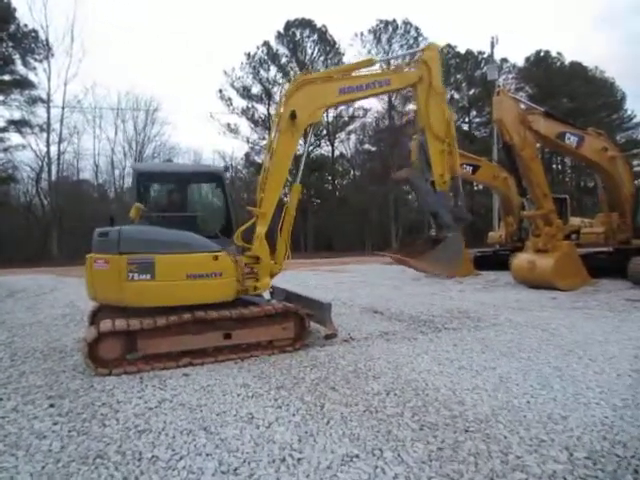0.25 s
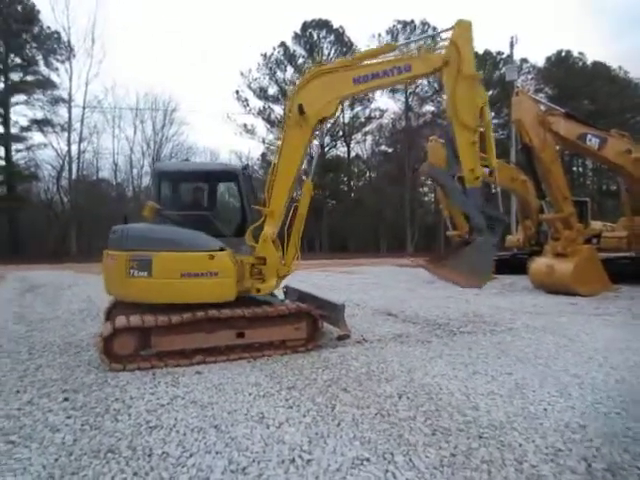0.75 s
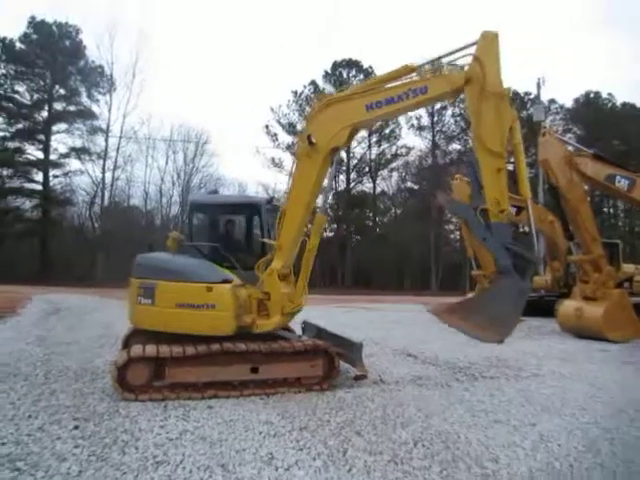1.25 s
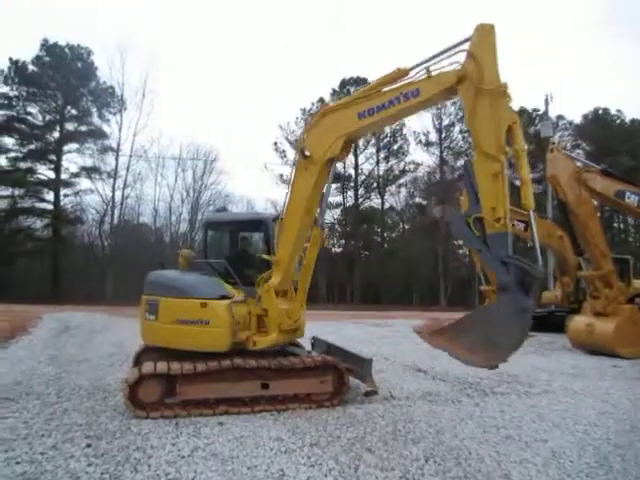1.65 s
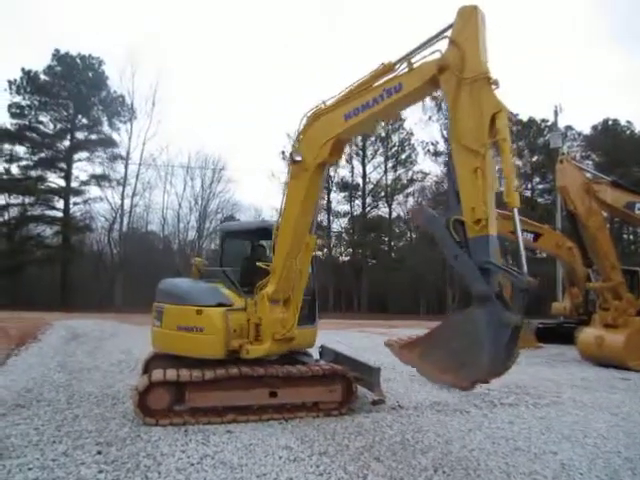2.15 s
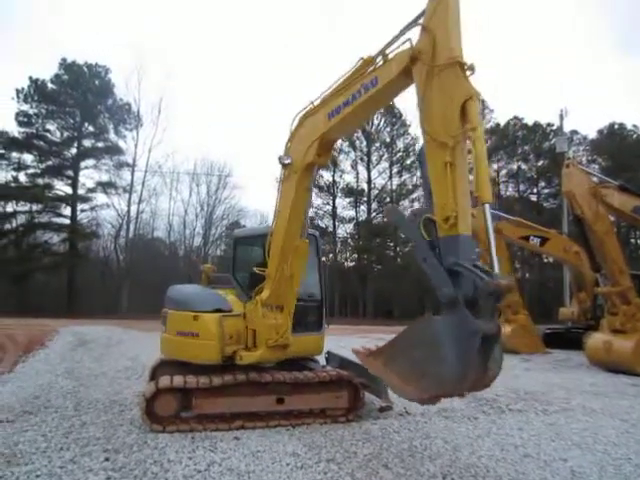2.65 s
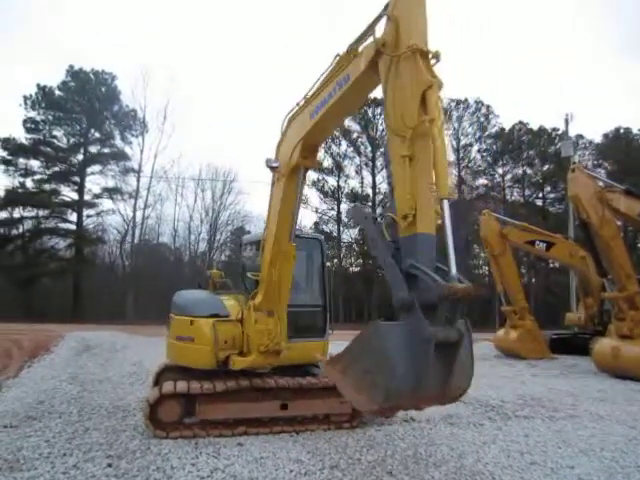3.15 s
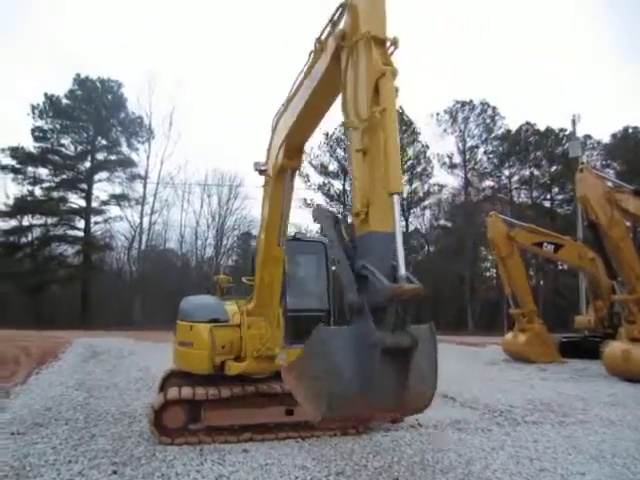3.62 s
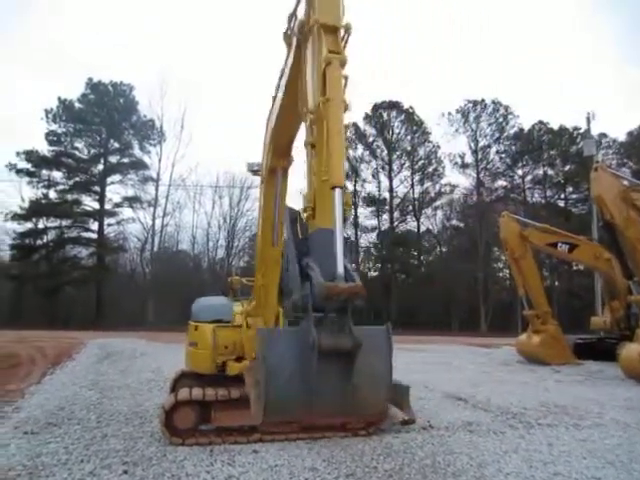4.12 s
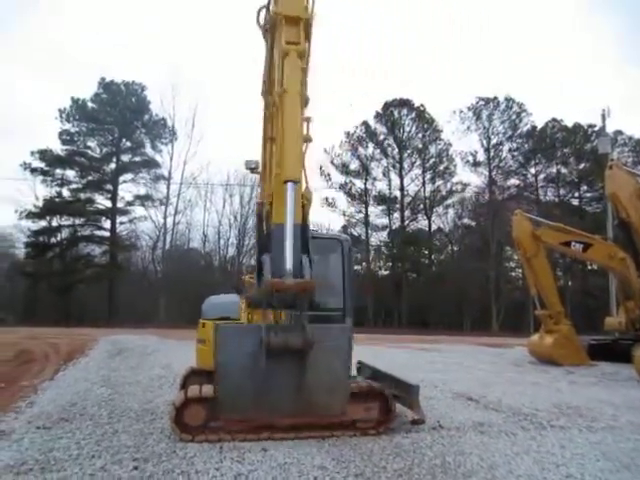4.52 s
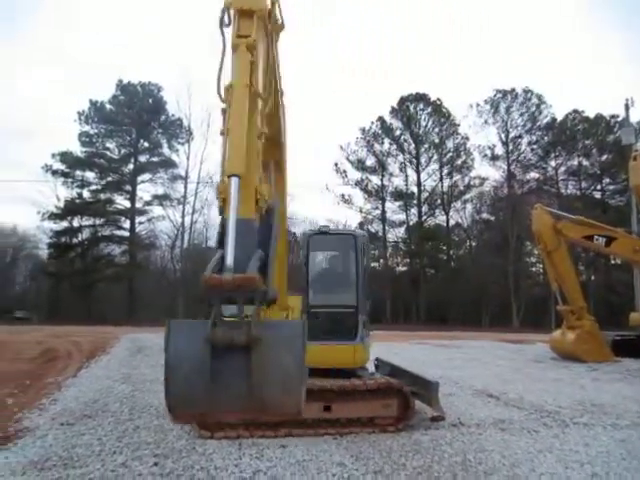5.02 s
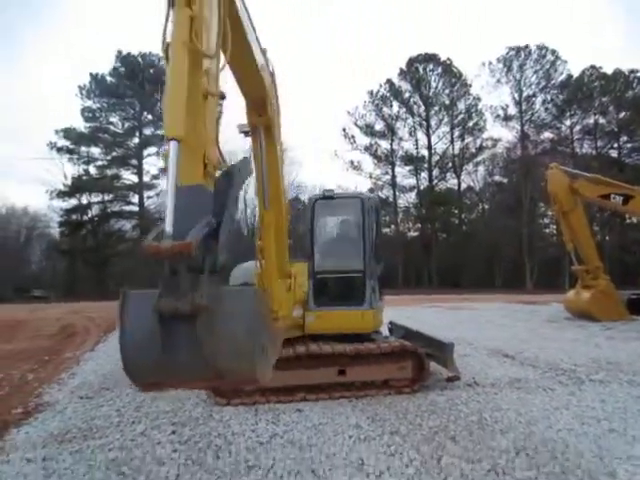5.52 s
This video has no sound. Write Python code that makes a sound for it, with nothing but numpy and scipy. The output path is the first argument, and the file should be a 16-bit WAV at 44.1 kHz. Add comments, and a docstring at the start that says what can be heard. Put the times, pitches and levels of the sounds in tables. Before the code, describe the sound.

A compact excavator's diesel engine is running outdoors from the start, at a steady working speed: a low exhaust drone with knocking, clatter and fan hiss, over a faint rumble of breeze. During the first two seconds a motor whine climbs in pitch as the machine swings, then fades by about 3 seconds. Higher hydraulic and gear tones and ringing from the metal covers swell and fade in turn. From about 3 seconds, gusts buffet the microphone, mostly on the left, with low thumps, pops and a few dry ticks. The hardest hit, near 3.4 seconds, briefly ducks the whole sound. Buffeting continues until about 5 seconds, then thins out. Meanwhile the engine grows quieter and duller as it turns away, is most muffled near 5 seconds, and recovers slightly before the end at almost 6 seconds.

```python
"""A compact excavator swings its boom on a gravel yard, its four-cylinder diesel held at working speed.
From the start: combustion knock, fan hiss, exhaust drone and pump whine over a low breeze.
Panel rings and gear tones beam past as the house turns; the swing motor climbs in pitch.
From about 3 s, gusts buffet the two microphone ports and the hardest peaks duck the gain.
The machine fades as the engine bay turns away, deepest behind the boom near 5 s."""
import sys
import numpy as np
from scipy import signal
from scipy.fft import rfft, irfft, next_fast_len
from scipy.io import wavfile

SR = 44100
rng = np.random.default_rng(int(sys.argv[2]) if len(sys.argv) > 2 else 0)


def transcribe(u):
    """Save the signal u as a 16-bit wav file named by the first command-line argument.

    u: samples, shape (n,) or (channels, n), limited to [-1, 1]; the rate is SR.
    q: integer samples, one column per channel.
    """
    v = np.clip(np.atleast_2d(u).T, -1, 1)
    q = np.round(v * 32767).astype(np.int16)
    wavfile.write(sys.argv[1], SR, q)


N = 254456
TIME_S = np.arange(N) / SR
FFT_SIZE = next_fast_len(N, True)
BIN_HZ = np.maximum(np.arange(FFT_SIZE // 2 + 1) * SR / FFT_SIZE, 1)

# Crankshaft speed. Each row: time in seconds, revolutions per second.
CRANK_SPEED = [(0.0, 33.6), (0.8, 34.07), (1.2, 34.12), (2.0, 34.27), (3.0, 34.2), (4.9, 34.21),
               (5.77, 34.3)]
# Edges in Hz of the five engine bands: rumble, panel, knock, clatter, hiss.
BAND_EDGES_HZ = [85, 380, 600, 1150, 1900, 15800]
# Lower four bands, before trim. Each row: start level in dB, slope in dB/s, loss behind the boom in dB.
BAND_LEVELS = [(-18.5, 1.03, 11), (-27.5, -0.69, 8.5), (-25, 0, 10), (-33, -0.5, 12.5)]
# Hiss band, before trim; the boom shadows it most. Each row: time in seconds, level in dB.
HISS_LEVEL = [(0, -49), (1.4, -49), (3.2, -51), (3.9, -54), (4.3, -59.5), (4.6, -63), (4.88, -67),
              (5.25, -62.5), (5.77, -59)]
# Engine noise shape within the bands. Each row: frequency in Hz, relative density in dB.
ENGINE_SPECTRUM = [(85, 2), (200, 3.5), (300, 1.5), (400, -8), (520, -8), (730, -10), (900, -17.5),
                   (1150, -24.5), (1420, -18), (2000, -33.5), (2400, -32.5), (3400, -41.5), (5000, -44),
                   (14000, -48.5)]
# Stereo balance of the machine. Each row: frequency in Hz, left minus right in dB.
BALANCE = [(100, -1), (400, -1), (750, -2.5), (1100, -3.5), (1450, -8.5), (1750, -9), (2050, 11),
           (2700, -3.5), (5000, 3.5), (12000, 4.5)]
# Stereo likeness of the engine noise. Each row: frequency in Hz, left-right coherence from 0 to 1.
COHERENCE = [(100, 1), (280, 0.97), (600, 1), (1400, 0.8), (2500, 0.4), (6000, 0.67), (14000, 0.72)]
# Cover panel resonances, with two low rows for the growl of the swing under load. Each row: centre in Hz, width
# in Hz, level over its band in dB before trim, # time facing us in seconds, beam sigma in seconds.
PANEL_MODES = [ (670, 43, -5, 0.16, 0.26), (752, 60, -10, 0.21, 1.9), (1046, 91, -9, 0.2, 0.42),
               (1216, 130, -4, 0.15, 0.85), (1019, 77, -9.5, 1.83, 0.25), (1367, 120, -6.5, 1.8, .8),
               (677, 210, -1.5, 1.53, 0.3), (774, 62, -5.5, 3.2, 0.15), (885, 59, -5.5, 3.05, 0.27),
               (1006, 87, -6.5, 3.3, 0.8), (233.5, 140, -6, 2.27, 0.75), (153, 60, -3, 1.53, 0.27),
               (1696, 47, -15, 5, 1.3), (794, 130, -8, 4.4, 0.77), (1029, 82, -11, 5.4, 0.91),
               (2227, 65, -4, 0.9, 0.87), (2230, 64, -12.5, 2.7, .6), (4840, 100, -17, 2.6, 1.9)]
# Steady engine tones: block, fan, pump stroke and a thin whistle. Each row: multiple of the four-stroke cycle
# rate, level over its band in dB.
STEADY_TONES = [(6, -21.5), (8, -15.5), (10, -23), (12, -12.5), (14, -19.5), (20, -20), (45, -12),
                (48, -19), (72, -21), (131, -16.5), (139, -19), (280, -28)]
# Pump and gear tones. Each row: multiple of the cycle rate (rounded in use), level in dB,
# time facing us in seconds, beam sigma in seconds.
PUMP_GEAR_TONES = [ (9, -28.5, 1.85, .3), (38, -33, 0.26, 0.52), (40, -28.5, 0.17, 0.39),
                   (40, -36, 1.95, 0.33), (44, -32.5, 1.3, 0.21), (45, -34, 0.17, 0.46),
                   (45, -35, 3.15, 0.38), (46, -33.5, 2.34, 0.57), (51, -34.5, 3.0, 0.57),
                   (57, -35.5, 1.5, 0.14), (57, -42, 2.9, 0.27), (60, -44, 2.95, .35),
                   (63.4, -41, .25, 0.51), (68, -48.5, 2.9, 0.29), (70.7, -45.5, 0.63, 0.15),
                   (79, -48, 1.3, 0.32), (82.3, -50, 2.6, .35), (83.2, -48, 2.2, 0.24),
                   (84, -48.5, 1.73, .17), (84, -49, 1.5, .2), (86, -52.5, 2.65, .2),
                   (89, -55.5, 2.75, 0.25), (95.3, -58, 3.0, .35), (97.7, -61, 1.6, 0.11)]
# Thin whistle that stands out as the hiss fades. One row, columns as above.
WHISTLE_TONE = (131, -65, 3.85, .45)
# Exhaust note. One row: start level in dB, slope in dB/s, loss behind the boom in dB.
EXHAUST_LEVEL = (-20.5, -1.4, 2.9)
# Hydraulic pump: piston tone, then its near octave. Columns as for the exhaust.
PUMP_LEVELS = [(-31, -2.5, -2.5), (-30, -3.5, -2.5)]
# Swing drive. Each row: time in seconds, motor pitch in Hz, motor level in dB, gear level in dB.
SWING_DRIVE = [(0, 469, -25, -26), (0.45, 496.5, -28, -55), (0.8, 522.6, -26, -53), (1.1, 549.5, -28, -51),
               (1.35, 590, -29, -29), (1.55, 620, -28.5, -46), (1.8, 679, -28.5, -54),
               (2.15, 701.4, -33.5, -52), (3.3, 718, -43, -60)]
# Breeze on the ports. Each row: time in seconds, level in dB.
BREEZE_LEVEL = [(0, -30), (1.7, -30.5), (2.7, -33.5), (3.1, -20.5), (3.35, -21), (3.55, -16.5), (3.85, -21),
                (3.99, -18.5), (4.12, -20.5), (4.8, -30.5), (5.77, -24)]
# Main wind buffets. Each row: centre in seconds, length in seconds, level in dB,
# port (0 left, 1 right), upper edge in Hz.
MAIN_BUFFETS = [ (3.278, 0.034, -10.5, 0, 282), (3.366, 0.037, -8.5, 0, 175), (3.396, 0.018, -10, 0, 335),
                (3.841, 0.083, -11.5, 0, 138), (3.951, 0.093, -9.5, 1, 99.5), (4.026, 0.015, -24, 0, 380),
                (4.057, 0.0059, -11.5, 0, 1090), (4.072, 0.02, -13.5, 0, 927), (4.145, 0.038, -16, 0, 695),
                (4.2, 0.015, -18, 0, 520), (4.234, 0.028, -17.5, 0, 406), (4.252, 0.042, -22.5, 0, 770),
                (4.271, .02, -15.5, 0, 464), (4.368, 0.02, -16.5, 0, 403.2), (4.386, 0.0097, -12.5, 0, 900),
                (4.393, 0.024, -13.5, 1, 414), (4.399, 0.0096, -15, 0, 1000), (4.425, 0.021, -19, 0, 382),
                (4.456, 0.017, -20, 0, 697), (4.485, 0.021, -20.5, 0, 700), (4.508, 0.016, -13, 0, 500),
                (4.54, 0.018, -29, 0, 380), (4.612, 0.016, -23.5, 0, 480), (4.652, 0.025, -19, 0, 550),
                (4.675, .018, -21, 0, 426), (4.775, 0.022, -15, 0, 556), (4.827, 0.025, -17, 0, 787),
                (4.882, 0.02, -21.5, 0, 476), (5.082, 0.028, -19.5, 0, 476), (5.588, 0.04, -13.5, 0, 99)]
# Hard eddies on the left port. Each row: time in seconds, push in dB, half-width in seconds.
HARD_EDDIES = [(3.275, 2, .0014), (3.371, 10, 0.0018), (4.058, 2.5, 0.0008), (4.149, -3, 0.0005),
               (4.398, -4, 0.0017), (4.458, -1.5, 0.0009), (4.512, -3.5, .0009), (4.65, -2.5, 0.0008),
               (4.81, -0.5, .001), (5.347, -3, 0.00095)]
# Dry ticks in strong wind. Each row: time in seconds, level in dB before the high-pass.
WIND_TICKS = [(3.279, -21), (3.3735, -9), (3.668, -29), (4.0595, -26), (4.401, -30), (4.537, -37)]


def from_db(db):
    """Decibels to gain."""
    return 10 ** (np.asarray(db) / 20)


def unit_rms(x):
    """Scale to unit power."""
    return x / np.sqrt(np.mean(x ** 2) + 1e-20)


def in_time(rows):
    """Each column of a time table at every sample."""
    times_s, *columns = np.transpose(rows)
    return [np.interp(TIME_S, times_s, column) for column in columns]


def at_hz(rows, hz):
    """Read a spectrum table on a log-frequency axis."""
    points_hz, values = np.transpose(rows)
    return np.interp(np.log(hz), np.log(points_hz), values)


def passband(low_hz, high_hz, order):
    """Butterworth band gain at every bin."""
    return ((1 + (low_hz / BIN_HZ) ** (2 * order)) * (1 + (BIN_HZ / high_hz) ** (2 * order))) ** -.5


def drift(rate_hz):
    """Smooth random wander, RMS about 1."""
    hop, settle = 100, 1000
    pole = np.exp(-2 * np.pi * rate_hz * hop / SR)
    noise = rng.standard_normal(N // hop + settle + 2)
    slow = signal.lfilter([1], [1, -2 * pole, pole * pole], noise)[settle:]
    return np.interp(np.arange(N) / hop, np.arange(len(slow)), unit_rms(slow))


def pan(hz):
    """Left and right gain of the machine."""
    return from_db(np.array([[.5], [-.5]]) * at_hz(BALANCE, hz))


def band_of(hz):
    """Index of the engine band holding a frequency."""
    return np.searchsorted(BAND_EDGES_HZ, hz) - 1


def bell(centre_s, sigma_s):
    """Gaussian window in time, peak 1."""
    return np.exp(-.5 * ((TIME_S - centre_s) / sigma_s) ** 2)


def heard_db(start_db, slope_db_per_s, boom_loss_db):
    """Level of a part as it swings round and passes behind the boom."""
    return start_db + slope_db_per_s * TIME_S - boom_loss_db * bell(centre_s=5.01, sigma_s=0.71)


def firing(cycles, decay_strokes=.65, uneven_db=1.0):
    """Envelope of four dying bursts a cycle; cylinders unequal, no two firings alike."""
    stroke = (4 * cycles).astype(int)
    cylinder_db = np.array([0.0, -1.0, 1.0, -1.0])[stroke % 4]
    strength = from_db(cylinder_db + uneven_db * rng.standard_normal(stroke[-1] + 1)[stroke])
    return unit_rms(strength * np.exp(-(4 * cycles % 1) / decay_strokes))


def rattle(cycles, renew_hz, size=2580):
    """Impacts recurring each cycle; the pattern slowly changes as the machine turns."""
    patterns = rng.standard_normal((int(TIME_S[-1] * renew_hz) + 2, size))
    patterns = unit_rms(patterns + .2 * np.roll(patterns, size // 2, axis=1))  # crank turns partly alike
    place = (cycles % 1 * size).astype(int)
    current = (TIME_S * renew_hz).astype(int)
    fade_rad = TIME_S * renew_hz % 1 * np.pi / 2
    return patterns[current, place] * np.cos(fade_rad) + patterns[current + 1, place] * np.sin(fade_rad)


def skin_force(impacts, bursts, locked_share, pulsed_share):
    """Force on the engine's skin: cycle-locked impacts plus turbulence, swelling with each firing."""
    turbulence = rng.standard_normal(impacts.shape)
    force = np.sqrt(locked_share) * impacts + np.sqrt(1 - locked_share) * turbulence
    return force * np.sqrt(1 - pulsed_share + pulsed_share * bursts ** 2)


def engine_noise(cycles, bursts, bands_db, right_lag_s=1.2e-5):
    """The shaken engine radiates five bands, rumble to hiss, reaching the left port first."""
    locked_shares, pulsed_shares = [.15, .25, 0.54, 0.7, 0.46], [0.18, 0.35, 0.22, 0.24, 0.34]
    trims_db = [-3.0, -2.0, -1.5, -8.5, 1.15]
    impacts = np.array([rattle(cycles, renew_hz=0.865) for _ in range(2)])
    coherence = at_hz(COHERENCE, BIN_HZ)
    to_ports = pan(BIN_HZ) * np.exp(-2j * np.pi * BIN_HZ * right_lag_s * np.array([[0], [1]]))
    colour = from_db(at_hz(ENGINE_SPECTRUM, BIN_HZ))
    out = 0
    for k, level_db in enumerate(bands_db):
        force = rfft(skin_force(impacts, bursts, locked_shares[k], pulsed_shares[k]), FFT_SIZE)
        mid, side = force * colour * passband(BAND_EDGES_HZ[k], BAND_EDGES_HZ[k + 1], order=10)
        stereo = np.sqrt(1 + coherence) * mid + np.sqrt(1 - coherence) * side * [[1], [-1]]
        band = irfft(to_ports * stereo, FFT_SIZE)[:, :N]
        out += from_db(level_db + trims_db[k]) * unit_rms(band)
    return out


def panels(cycles, bursts, bands_db, trim_db=-2.5):
    """Each cover panel rings at its own pitch, heard while the swing turns it towards us; the lowest rows growl
    as the swing takes load."""
    force = skin_force(rattle(cycles, renew_hz=1.113), bursts, locked_share=0.45, pulsed_share=0.057)
    out = 0
    for hz, width_hz, db, facing_s, sigma_s in PANEL_MODES:
        resonance = signal.butter(2, [hz - width_hz / 2, hz + width_hz / 2], "band", fs=SR, output="sos")
        beam = bell(facing_s, sigma_s)
        ring = signal.sosfilt(resonance, force)
        ring /= np.sqrt(np.average(ring ** 2, weights=beam ** 2))
        out += pan(hz) * ring * beam * from_db(bands_db[band_of(hz)] + db + trim_db)
    return out


def tone(cycles, multiple, level_db, waver_db):
    """Sine locked to the engine, wavering in level and phase."""
    hz = multiple * cycles[-1] / TIME_S[-1]
    phase_rad = 2 * np.pi * (multiple * cycles + rng.random()) + .22 * waver_db * drift(5.5)
    return np.sqrt(2) * np.sin(phase_rad) * from_db(level_db + waver_db * drift(0.94)) * pan(hz)


def steady_tones(cycles, bands_db):
    """Steady engine tones rise and fall with their band."""
    cycle_hz = cycles[-1] / TIME_S[-1]
    return sum(tone(cycles, round(multiple), bands_db[band_of(multiple * cycle_hz)] + db, waver_db=-1.0)
               for multiple, db in STEADY_TONES)


def beamed_whines(cycles, flutter_db=2.5, flutter_hz=5):
    """Pump and gear tones, then a whistle, swell and fade in turn as the house swings."""
    out = 0
    for multiple, db, facing_s, sigma_s in PUMP_GEAR_TONES + [WHISTLE_TONE]:
        level_db = db + flutter_db * drift(flutter_hz)
        out += tone(cycles, round(multiple), level_db, waver_db=0.8) * bell(facing_s, sigma_s)
    return out


def exhaust(cycles):
    """Drone near the firing rate of four beats a cycle."""
    return tone(4 * cycles, 0.98, heard_db(*EXHAUST_LEVEL), waver_db=1.3)


def pump(cycles):
    """Ten pistons, twenty strokes a cycle: one tone near that rate, one at double the rate."""
    strokes = 20 * cycles
    piston_db, octave_db = [heard_db(*row) for row in PUMP_LEVELS]
    return tone(strokes, 0.98, piston_db, waver_db=1.8) + tone(strokes, 2, octave_db, waver_db=5.3)


def swing_motor(width_hz=34, gear_ratio=1.7, mesh_ratio=2.46, mesh_db=-23.5):
    """Narrow-band whine climbing as the house gathers speed; the gears sing above it."""
    motor_hz, motor_db, gear_db = in_time(SWING_DRIVE)
    out = 0
    for ratio, db in ((1, motor_db), (gear_ratio, gear_db), (mesh_ratio, motor_db + mesh_db)):
        phase_rad = 2 * np.pi * ratio * np.cumsum(motor_hz) / SR
        whine = drift(width_hz) * np.cos(phase_rad) + drift(width_hz) * np.sin(phase_rad)
        out += from_db(db) * whine * pan(ratio * motor_hz.mean())
    return out


def breeze(low_hz=28.4, high_hz=87, waver_db=2.0):
    """Slow eddies rumble on each port separately."""
    spectrum = rfft(rng.standard_normal((2, FFT_SIZE)))
    rumble = irfft(spectrum * passband(low_hz, high_hz, order=3))[:, :N]
    waver = from_db(waver_db * np.array([drift(2.5), drift(12.0)]))
    return unit_rms(rumble) * waver * from_db(in_time(BREEZE_LEVEL)[0])


def lesser_buffets(count=22, from_s=3.0, to_s=5.5, length_s=0.09, left_share=.8):
    """Rows of small random buffets, stronger and brighter at the height of the gust."""
    gust_peak_s, gust_sigma_s = 4.55, 0.49
    jitter, side = rng.random((count, 2)).T
    centre_s = from_s + (to_s - from_s) * (np.arange(count) + jitter) / count
    gust = np.exp(-.5 * ((centre_s - gust_peak_s) / gust_sigma_s) ** 2)
    level_db = -22.5 + 3.5 * gust
    top_hz = 131.5 * 2 ** (1.4 * gust)
    port = (side > left_share).astype(int)
    return list(zip(centre_s, np.full(count, length_s), level_db, port, top_hz))


def buffets(eddies_per_period=1.2, spread_db=6.5, band_ratio=2.19, port_hz=1400, size=16384):
    """Each gust sheds eddies over one port: pressure spikes, denser and sharper in faster air."""
    out = np.zeros((2, N + 2 * size))
    t_s = (np.arange(size) - size // 2) / SR
    port_filter = signal.butter(5, port_hz, fs=SR, output="sos")
    for centre_s, length_s, db, port, top_hz in MAIN_BUFFETS + lesser_buffets():
        hits = rng.random(size) < eddies_per_period * top_hz / SR
        spikes = hits * from_db(spread_db * np.clip(rng.standard_normal(size), -2, 2))
        body = signal.butter(2, [top_hz / band_ratio, top_hz], "band", fs=SR, output="sos")
        swell = np.exp(-np.abs(1.7 * t_s / length_s) ** 4)
        gust = signal.sosfilt(port_filter, signal.sosfilt(body, spikes + 1e-18) * swell)
        gust *= from_db(db) / np.sqrt(np.sum(gust ** 2) / (length_s * SR) + 1e-20)
        start = round(centre_s * SR) + size // 2
        out[port, start:start + size] += gust
    return out[:, size:size + N]


def eddy_pops(suction_ratio=6, size=2048):
    """A hard eddy is one short push on the diaphragm inside a longer, shallow suction."""
    out = np.zeros((2, N))
    t_s = (np.arange(size) - size // 2) / SR
    for centre_s, db, half_width_s in HARD_EDDIES:
        push = np.exp(-(t_s / half_width_s) ** 2)
        suction = np.exp(-(t_s / (suction_ratio * half_width_s)) ** 2) / suction_ratio
        start = round(centre_s * SR) - size // 2
        out[0, start:start + size] += from_db(db) * (push - suction)
    return out


def ticks(low_hz=3000):
    """Single sharp edges on the left port, no bass."""
    clicks = np.zeros((2, N))
    for at_s, db in WIND_TICKS:
        clicks[0, round(at_s * SR)] = from_db(db)
    return signal.sosfilt(signal.butter(2, low_hz, "high", fs=SR, output="sos"), clicks + 1e-18)


def gain_control(x, threshold_db=-1.5, attack_s=0.0014, release_db_per_s=18.0, deaf_below_hz=45):
    """A sharp peak on either port ducks both, deep bass hardly does; the gain recovers steadily."""
    sensed = signal.sosfilt(signal.butter(2, deaf_below_hz, "high", fs=SR, output="sos"), x)
    peak_db = 20 * np.log10(np.abs(sensed).max(axis=0) + 1e-9)
    over_db = np.maximum(peak_db - threshold_db, 0)
    release_db = release_db_per_s * TIME_S
    held_db = np.maximum.accumulate(over_db + release_db) - release_db
    pole = np.exp(-1 / (attack_s * SR))
    duck_db = signal.lfilter([(1 - pole) ** 2], [1, -2 * pole, pole * pole], held_db)
    return x * from_db(-duck_db)


def scene():
    """The machine, its speed trembling slightly, and the wind."""
    crank_hz = in_time(CRANK_SPEED)[0] * (1 + .0007 * drift(4))
    cycles = np.cumsum(crank_hz) / SR / 2  # two crank turns a cycle
    bands_db = [heard_db(*row) for row in BAND_LEVELS] + in_time(HISS_LEVEL)
    bursts = firing(cycles)
    machine = engine_noise(cycles, bursts, bands_db) + panels(cycles, bursts, bands_db)
    machine += steady_tones(cycles, bands_db) + beamed_whines(cycles)
    machine += exhaust(cycles) + pump(cycles) + swing_motor()
    return machine + breeze() + buffets() + eddy_pops() + ticks()


def record(dry):
    """Microphone chain: treble dip, gain control, rounded overload, top cut."""
    notch_hz, notch_q, notch_share, cutoff_hz = 7800, 1.6, .88, 15800
    notched = signal.lfilter(*signal.iirnotch(notch_hz, notch_q, fs=SR), dry)
    levelled = gain_control(notch_share * notched + (1 - notch_share) * dry)
    rounded = levelled / (1 + levelled ** 8) ** (1 / 8)
    return signal.sosfilt(signal.ellip(10, .1, 80, cutoff_hz, fs=SR, output="sos"), rounded)


dry = scene()
out = record(dry)
transcribe(out)
```